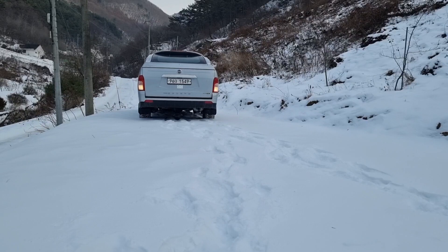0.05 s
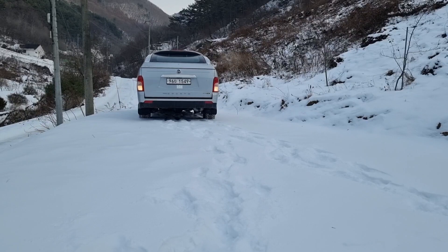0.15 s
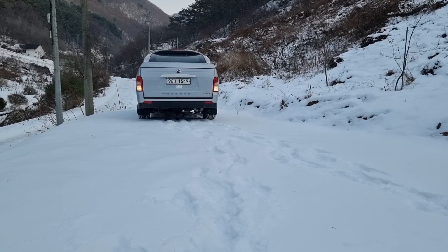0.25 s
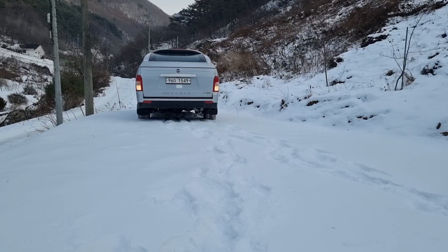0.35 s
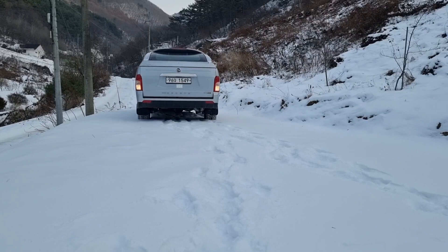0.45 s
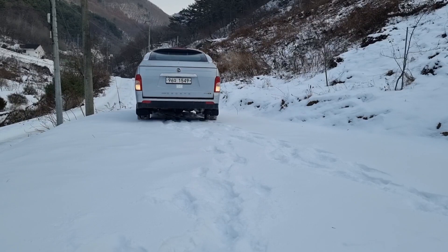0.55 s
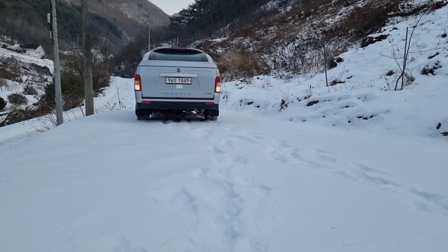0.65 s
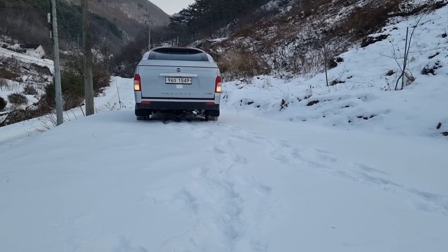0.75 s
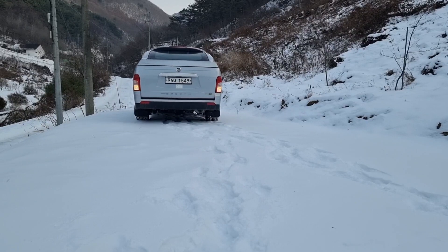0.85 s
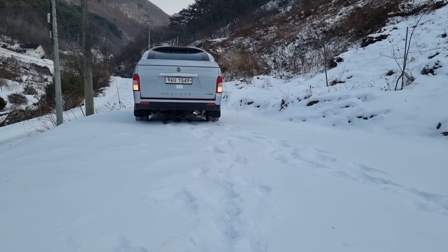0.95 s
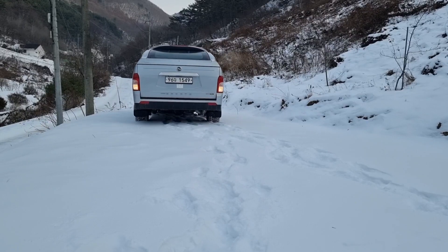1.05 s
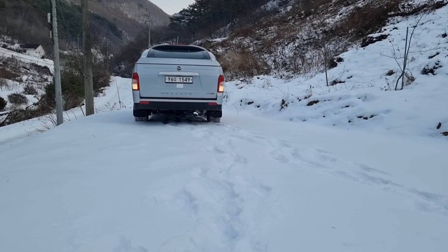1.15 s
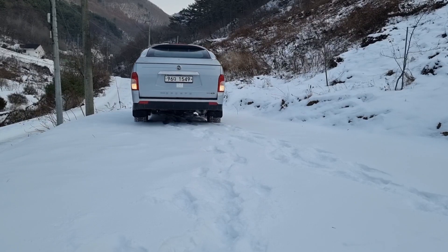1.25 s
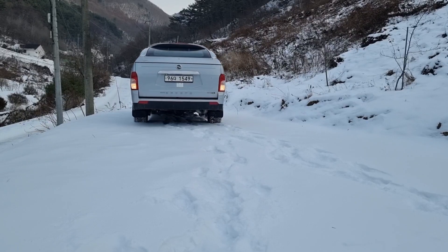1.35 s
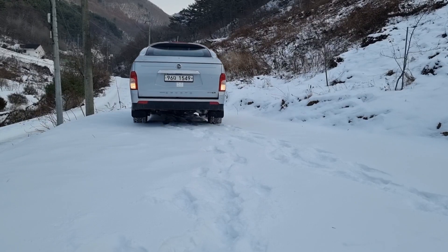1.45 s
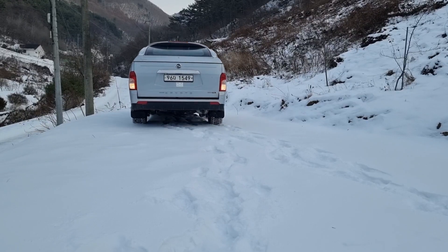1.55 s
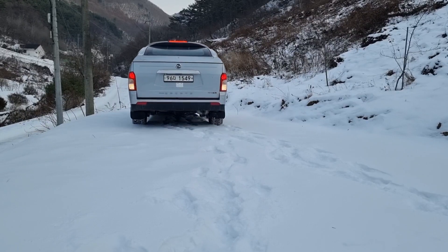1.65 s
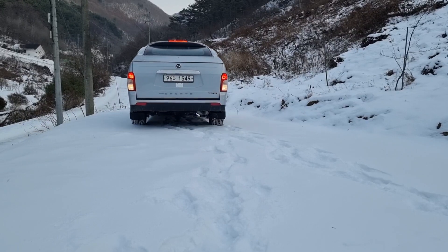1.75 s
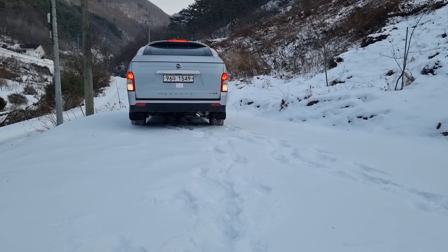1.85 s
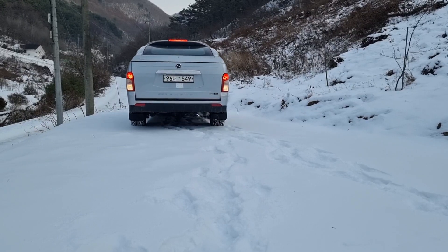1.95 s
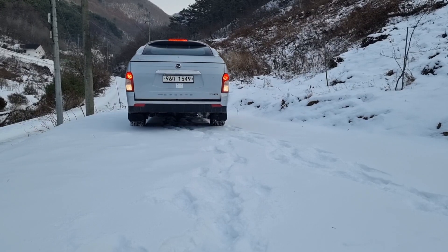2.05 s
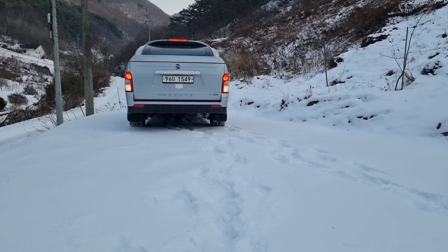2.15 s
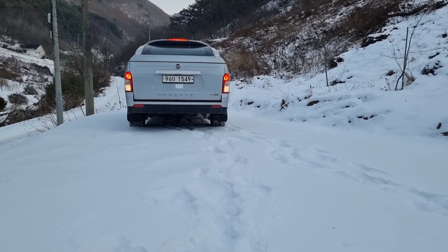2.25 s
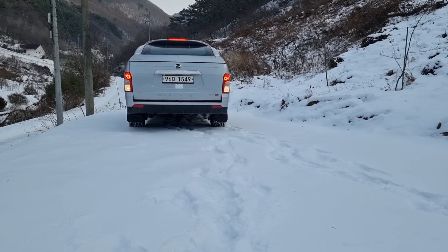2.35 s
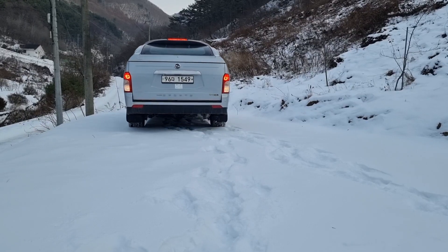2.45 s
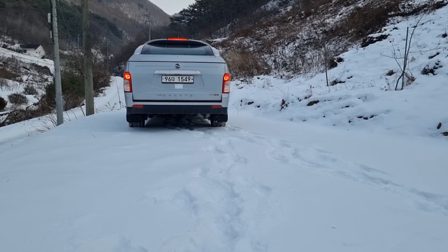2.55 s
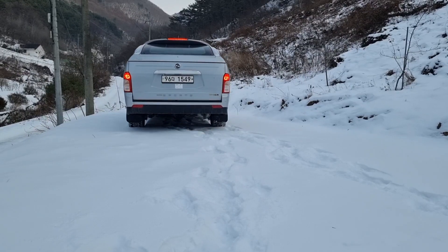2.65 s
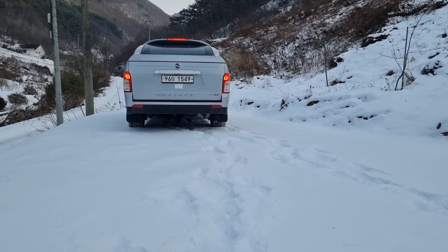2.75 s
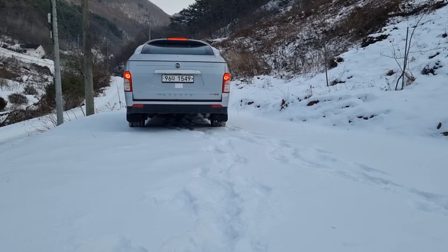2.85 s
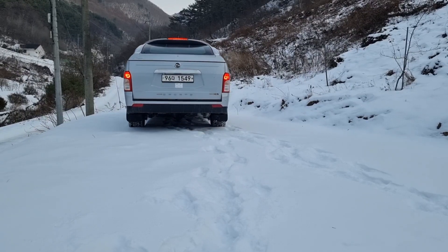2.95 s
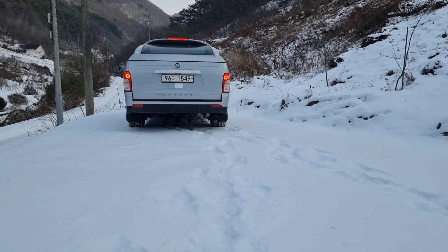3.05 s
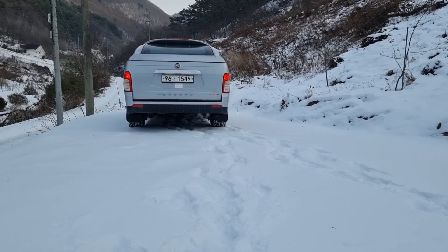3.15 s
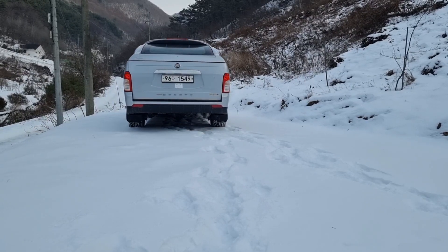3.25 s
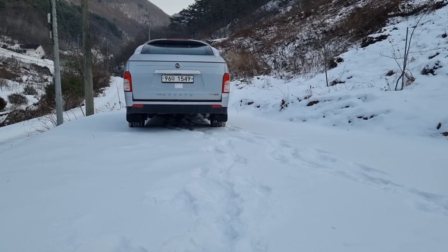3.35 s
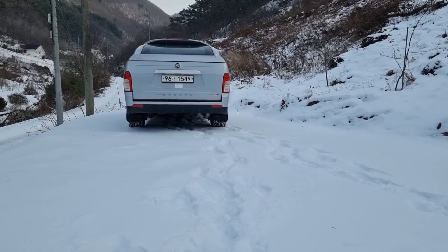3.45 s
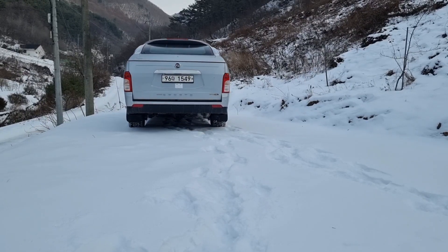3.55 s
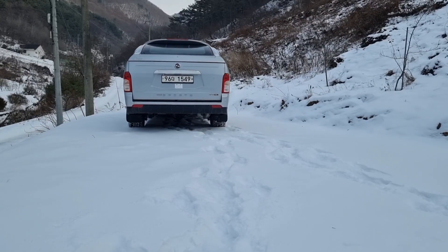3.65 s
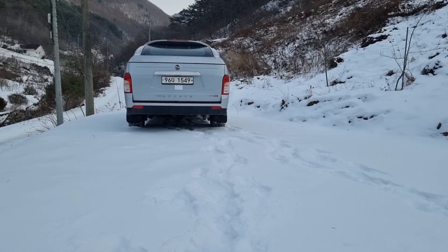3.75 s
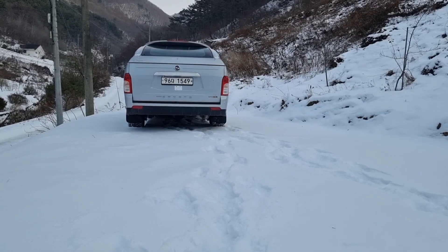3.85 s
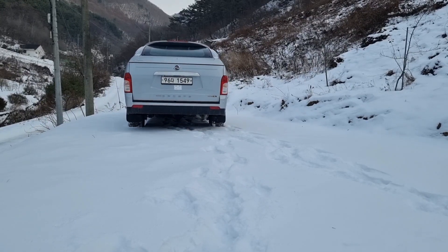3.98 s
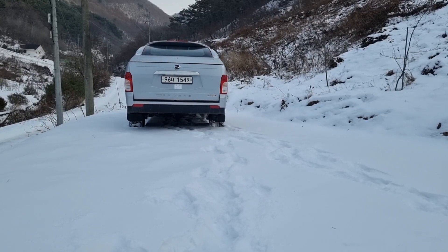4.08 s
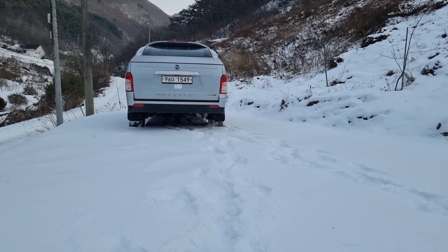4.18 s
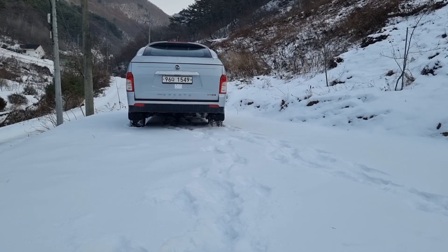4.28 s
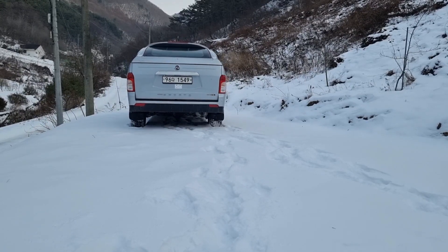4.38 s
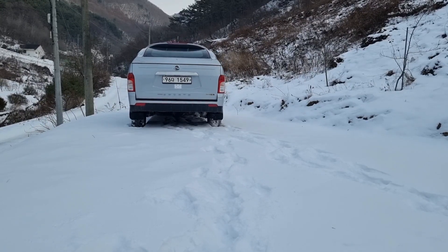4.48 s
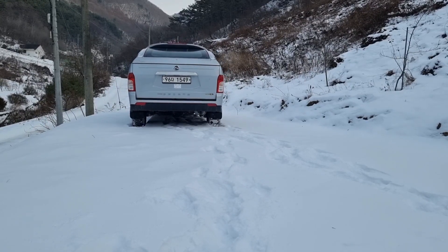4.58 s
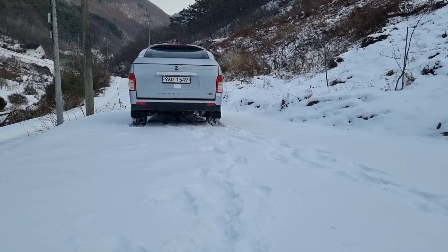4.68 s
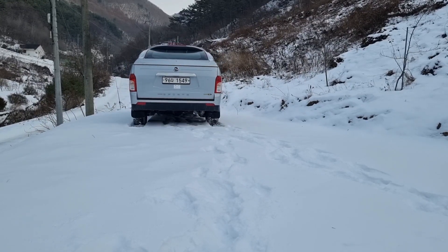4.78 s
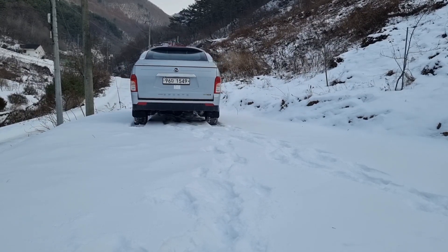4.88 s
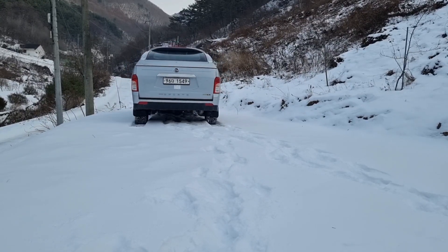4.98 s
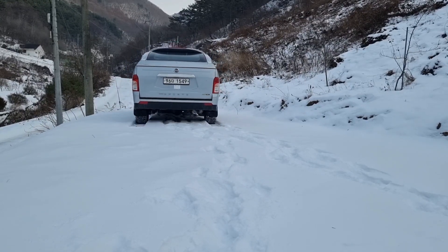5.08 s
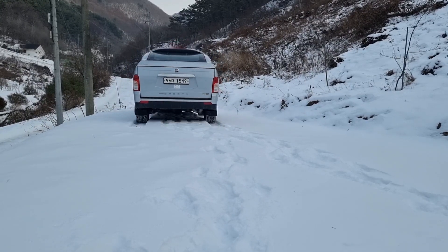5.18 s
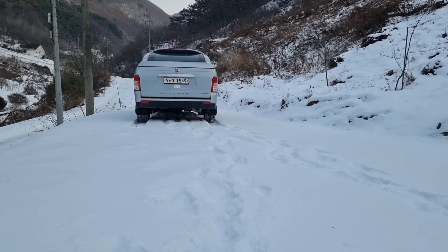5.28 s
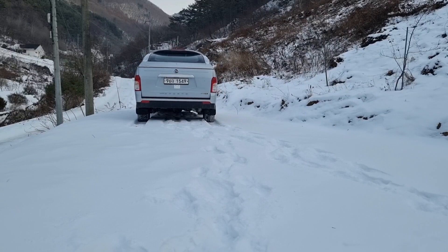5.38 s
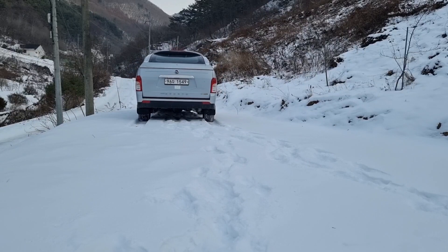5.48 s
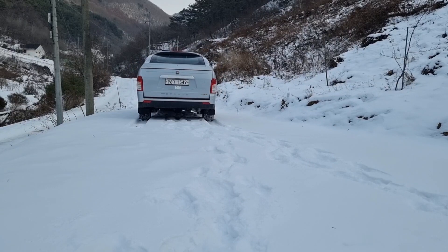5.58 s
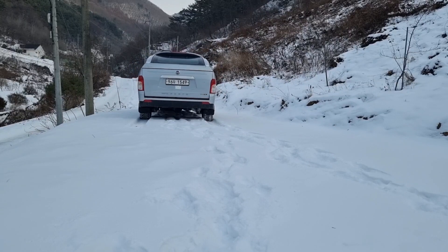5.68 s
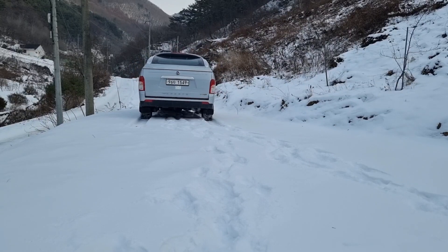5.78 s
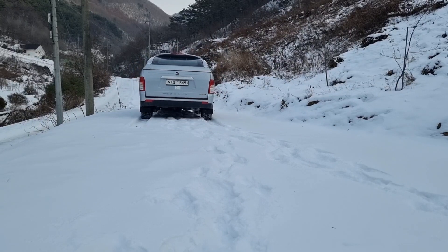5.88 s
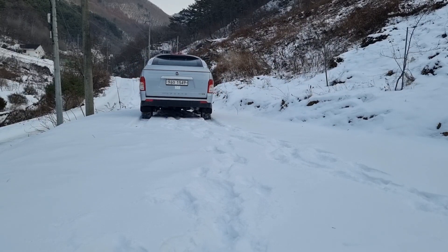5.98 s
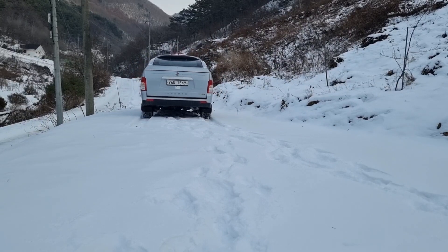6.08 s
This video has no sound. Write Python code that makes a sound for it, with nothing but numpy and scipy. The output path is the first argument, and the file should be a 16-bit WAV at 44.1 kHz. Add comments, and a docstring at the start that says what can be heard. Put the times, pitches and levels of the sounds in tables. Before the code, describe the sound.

A diesel pickup backs through crunching deep snow, stops and idles with a clatter, clunks into gear, then pulls away revving and whining.

```python
"""A four-cylinder diesel pickup backs up through deep snow, stops, idles, clunks into gear and pulls away revving.
The exhaust is a stack of tones locked to the firing rate; each firing also knocks as a burst of noise.
Valve gear pings, panels drone and gears whine; clunks, snaps and squeaks are brief rings, noises and glides.
The tyres pack the snow with a lumpy rumble, crunch and grains; low thuds come from snow, wind and exhaust.
It is heard from behind through two microphone ports on an open hillside, over faint air noise and hiss."""
import sys
import numpy as np
from scipy import signal
from scipy.fft import rfft, irfft
from scipy.io import wavfile
from scipy.ndimage import uniform_filter1d

SR = 44100
rng = np.random.default_rng(int(sys.argv[2]) if len(sys.argv) > 2 else 0)


def generate_wav(sig):
    """Save sig (samples, or channels by samples) to the path in sys.argv[1] as 16-bit PCM at SR."""
    pcm = np.round(np.clip(np.atleast_2d(sig).T, -1, 1) * 32767).astype(np.int16)
    wavfile.write(sys.argv[1], SR, pcm)


N = 269892
T = np.arange(N) / SR  # time of each sample (s)
HZ = np.fft.rfftfreq(N, 1 / SR)  # frequency axis of the spectra

# Spectra give only a tone colour: dB per Hz is relative, and the level is set elsewhere.
# Far valley and preamp hiss. Each row: frequency in Hz, level in dB per Hz.
AIR = [(60, -21.5), (120, 4), (250, -27), (600, -20), (1100, -22), (2800, -25.5), (8000, -39.5),
       (11400, -44), (12500, -41), (15600, -43)]
AIR_DB = -68.5

# Likeness of broad noise at the two ports. Each row: frequency in Hz, likeness from 0 to 1.
SAME = [(30, .2), (70, 0.72), (130, 0.97), (250, .8), (400, 0.42), (550, 0.68), (800, .4), (1100, 0.61),
        (1400, 0.17), (1900, 0.76), (2300, 0.81), (2700, 0.31), (4200, 0.72), (5500, 0.29), (7000, 0.35),
        (8500, 0.48), (11000, .1), (15000, .02)]
# How far broad noise at the left port leads. Each row: frequency in Hz, lead in radians.
TURN = [(330, 0), (520, 1), (750, 1.25), (1100, 3), (1400, 1.2), (1700, -0.3), (2100, 0.25), (2800, 0.37),
        (4200, -0.15), (6500, 1), (8200, -1), (10000, 2.5)]
# Balance of the ports. Each row: frequency in Hz, left over right in dB.
LEAN_DB = [(60, 1.5), (180, 0.3), (300, 1), (450, 5.5), (700, 2.5), (1200, 2), (1700, 2), (2500, 4.5),
           (4200, 2), (5600, 4), (7400, 6.5), (8200, -1.4), (15000, 0.5)]
LEAD_S = 6.2e-5  # the truck is nearer the left port
EDGE_HZ = 15650  # upper limit of the sound

# Level of the deepest bass. Each row: time in seconds, middle level in dB.
BOOM = [(0, -62), (.6, -53.5), (1.9, -49.5), (2.5, -49.5), (3.0, -51.5), (3.7, -53.5), (4.1, -54.5),
        (4.9, -52), (5.3, -56), (6.12, -56)]
# Colour of the deepest bass. Each row: frequency in Hz, level in dB per Hz.
BOOM_COLOUR = [(5, -71.5), (12, -26.5), (25, -4), (45, 9.5), (58, 13.0), (75, -32.5), (120, -78.0), (240, -110)]

# Short low thuds: snow under the tyres, wind buffets while standing, hard exhaust puffs when pulling away.
# Each row: middle in seconds, length in seconds, peak in dB, pitch in Hz.
THUDS = [(0.062, 0.24, -60, 85.4), (0.175, 0.068, -42, 81.7), (0.508, 0.14, -40.5, 99.6),
         (0.7, 0.084, -43, 41.5), (0.778, .08, -50, 84), (1.092, 0.093, -42, 83.6),
         (1.16, 0.18, -46, 101.6), (1.239, 0.12, -51, 49.7), (1.27, .07, -47, 107),
         (1.463, 0.15, -42.5, 82.8), (1.543, 0.084, -41.5, 74), (1.621, 0.074, -44, 48.6),
         (1.714, 0.06, -37, 95.4), (1.77, 0.1, -59, 204.3), (1.793, 0.1, -44, 80.8),
         (1.829, 0.098, -48, 53), (1.962, 0.16, -37.5, 65.36), (2.113, 0.11, -37.5, 80.4),
         (2.18, 0.094, -33, 88.3), (2.344, 0.12, -34.5, 82.7), (2.427, 0.064, -37, 85.2),
         (2.584, 0.097, -34.5, 89), (2.721, .07, -35.5, 108.6), (2.914, 0.13, -40.5, 63.7),
         (2.962, 0.036, -43, 63), (3.08, 0.05, -37.5, 72.5), (3.327, 0.051, -38.5, 66),
         (3.42, 0.12, -37.5, 54.1), (3.785, 0.03, -41.5, 63.7), (3.8, 0.049, -61, 200),
         (3.856, 0.1096, -36.5, 97.5), (3.86, 0.046, -50, 202.5), (3.908, 0.062, -32, 83),
         (3.943, 0.0447, -33, 102.6), (3.94, 0.0598, -45.5, 177.5), (4.021, 0.095, -38, 37.7),
         (4.06, 0.089, -59.5, 199), (4.16, 0.14, -47.5, 53), (4.305, 0.08, -46, 63.3),
         (4.655, 0.11, -37.5, 91), (4.706, 0.03, -36, 64.9), (4.764, 0.021, -37, 65),
         (4.822, 0.051, -41, 66), (4.947, 0.029, -35, 65), (4.981, 0.026, -28.5, 51.3),
         (5.083, 0.082, -33, 62.5), (5.354, 0.16, -42.5, 52.7)]
THUD_CRUNCH_DB = -36  # crunch added along with a thud, on top of the thud's own dB
# While the truck stands the low thuds differ more between the ports.
STANDING_FROM_S, STANDING_TO_S, STANDING_DRIFT = 2.8, 3.75, 1.1  # extra drift in radians

# Tyres rolling in snow. Each row: time in seconds, rumble level in dB, crunch level in dB.
ROLLING = [(0, -52, -69), (.4, -54, -70.5), (.55, -52, -72), (.95, -49, -69), (1.2, -46.5, -68.5),
           (1.5, -49, -70.5), (1.58, -55, -68), (1.78, -49.5, -68), (1.84, -48, -70.5), (1.92, -50, -66),
           (2.06, -47, -71.5), (2.35, -44.5, -66), (2.7, -43, -68.5), (2.82, -53.5, -73.5),
           (3.55, -67.5, -78.5), (3.74, -67, -81), (3.79, -57.5, -60), (3.84, -44, -66.5),
           (4.05, -48, -66.5), (4.4, -51, -66), (4.9, -47, -65), (5.25, -57, -70), (5.8, -51, -66.5),
           (6.12, -53, -62.5)]
# Colour of the rumble. Each row: frequency in Hz, level in dB per Hz.
RUMBLE = [(8, -59.5), (20, -27), (35, -10), (55, -7), (75, 5.5), (100, 2), (130, -3.5), (180, -11),
          (250, -22), (320, -61.5), (600, -110)]
# Colour of the crunch. Each row: frequency in Hz, level in dB per Hz.
CRUNCH = [(60, -68), (150, -16.5), (220, -7.5), (300, -1.5), (400, -1), (700, -6.5), (1150, -6.5),
          (1600, -13), (3000, -50.5), (8000, -88)]
# Resonance in the crunch. Each row: frequency in Hz, width in Hz, share of power in dB.
CRUNCH_RINGS = [(1150, 130, -10.5)]
# The loudest grains of snow giving way. Each row: time in seconds (2 ms after onset), peak in dB, pitch in Hz.
GRAINS = [(.214, -64, 1130), (.757, -67, 860), (.975, -67, 1150), (.998, -59.5, 855), (1.03, -68, 1150),
          (1.055, -66, 1140), (1.08, -67, 1150), (1.095, -63, 866), (1.108, -64.5, 1150),
          (1.222, -68, 1120), (1.243, -68, 1220), (1.385, -68, 1100), (1.427, -61, 780), (1.48, -72, 1160),
          (1.555, -65, 1130), (1.59, -70, 1200), (1.65, -64.5, 1220), (1.716, -73, 1230),
          (1.765, -68, 1050), (1.895, -68, 1150), (1.915, -69, 1020), (2.137, -69, 1130),
          (2.224, -63.5, 1124), (2.253, -61, 734), (2.282, -61, 850), (2.307, -62, 1040),
          (2.342, -60, 1150), (2.345, -60, 600), (2.352, -65, 826), (2.376, -64, 1130), (2.391, -61, 1130),
          (2.417, -63.5, 740), (2.422, -65, 1130), (2.465, -72, 1170), (2.492, -60, 1129),
          (2.496, -61, 554), (2.546, -65, 1120), (2.546, -64, 800), (2.581, -59, 538), (2.583, -67, 850),
          (2.586, -64, 1080), (2.598, -66, 1180), (2.615, -61, 790), (2.693, -60, 530), (2.708, -74, 950),
          (2.713, -60, 550)]
GRIT_SHARE, GRIT_DB = 2.5, -81  # random grains: dB per dB of crunch, middle level in dB

# Driveline taking up slack. Each row: start in seconds, peak in dB.
CLUNKS = [(3.7748, -40.5), (3.8178, -35)]
# Ringing of the gear case. Each row: frequency in Hz, level in dB, time to fall 60 dB in seconds.
GEARS = [(1100, 7, 0.055), (1237, 16, 0.023), (1425, 2, 0.038), (1680, -6, .05), (2800, -8, .025)]
# Sharp snaps from under the truck. Each row: start in seconds, level in dB, centre in Hz,
# time to fall 60 dB in seconds, width as a factor either side.
SNAPS = [(1.615, -53.5, 3230, 0.039, 1.1), (1.616, -67, 1850, .06, 1.1), (2.6532, -53.5, 2140, 0.047, 1.12),
         (2.654, -62, 7100, 0.048, 1.08), (2.653, -53, 3360, .05, 1.1), (2.66, -59, 4950, 0.043, 1.1),
         (2.655, -70, 11100, .03, 1.1), (2.653, -55, 1530, 0.037, 1.15), (2.654, -60, 800, .04, 1.4),
         (2.654, -49, 3950, 0.033, 1.07), (2.731, -56.5, 1970, .024, 1.1), (3.375, -61, 1700, 0.062, 1.7),
         (3.778, -47.5, 550, 0.067, 1.22), (3.79, -66, 6400, .082, 1.1), (3.791, -60, 1800, .04, 1.8),
         (3.824, -56, 2800, 0.067, 1.06), (3.829, -50, 1450, 0.032, 1.24), (3.842, -54, 1350, 0.066, 1.3),
         (3.84, -64, 3220, .045, 1.7), (3.874, -60, 1100, .03, 1.5), (3.981, -65, 1810, .025, 1.3),
         (4.023, -62, 2600, .049, 1.7), (4.265, -59, 2400, 0.043, 1.8), (4.59, -58, 2900, 0.056, 1.1),
         (4.711, -55, 3050, 0.063, 1.1), (4.743, -56, 2250, .06, 1.16), (4.768, -62, 5840, .062, 1.05),
         (4.816, -62, 3050, 0.12, 1.12), (4.818, -62, 5100, .04, 1.1), (5.073, -63, 3050, .035, 1.1),
         (5.134, -57, 2770, .04, 1.35)]
# Squeaks and grunts as the body lurches. Each row: start in seconds, peak in dB, from Hz, to Hz,
# length in seconds, width in Hz.
SQUEAKS = [(3.885, -65, 567, 614, 0.053, 30), (3.911, -55, 616, 650, .03, 30),
           (3.917, -57.5, 430, 416, 0.023, 30), (3.936, -62.5, 3900, 3820, 0.043, 120),
           (3.938, -56, 866, 865, 0.03, 40), (3.94, -60, 391, 400, 0.037, 30),
           (3.98, -60, 600, 620, 0.021, 40), (4.018, -56, 840, 830, 0.031, 40),
           (4.025, -62, 3950, 3900, 0.053, 100), (4.022, -56, 648, 700, 0.033, 40),
           (4.036, -52, 870, 714, 0.031, 40), (4.082, -56, 700, 672, 0.058, 40),
           (4.085, -62, 596, 580, 0.04, 40), (4.135, -57.5, 585, 700, 0.024, 50),
           (4.4, -61, 410, 398, 0.044, 60)]

# Torque through the driveline, as panel levels. Each row: time in seconds, floor pan in dB, tailgate in dB.
TORQUE = [(3.72, -110, -110), (3.79, -66, -70), (3.95, -83, -74.5), (4.08, -79, -65.5), (4.35, -62, -64.5),
          (4.55, -68, -70), (4.72, -61, -64.5), (4.9, -64, -68), (5.1, -71.5, -72), (5.4, -67, -76),
          (5.55, -65, -71), (5.66, -70, -62.5), (5.9, -62, -61.5), (6.12, -69.5, -64)]
# Resonances of each panel. Each row: frequency in Hz, width in Hz, share of power in dB.
FLOOR_PAN = [(543, 31, 9), (664, 180, 0.67)]
TAILGATE = [(700, 52, 7), (640, 13, -8.5), (810, 31, -2.5)]
# Colour of each panel's noise. Each row: frequency in Hz, level in dB per Hz.
PAN_COLOUR = [(250, -80.5), (550, -7.5), (1100, -56.0)]
GATE_COLOUR = [(350, -56.0), (720, 3.0), (1400, -63.5)]
# A rough hum in the body under load. Each row: time in seconds, level in dB.
HUM = [(3.8, -76), (3.82, -88), (3.91, -64.5), (3.97, -70), (4.11, -62), (4.16, -67), (4.45, -78),
       (4.47, -55.5), (4.57, -57), (4.58, -72), (4.61, -53.5), (4.69, -67), (4.73, -59), (4.82, -63.5),
       (4.97, -60), (5.04, -65), (5.06, -74), (5.5, -66), (5.56, -59.5), (5.62, -78), (5.69, -65),
       (5.76, -67.5), (5.8, -53), (5.84, -57), (5.89, -56.5), (5.91, -64), (6.0, -56.5), (6.1, -64)]
HUM_HZ, HUM_WIDTH_HZ, HUM_PURE = 603, 30, 0.72  # HUM_PURE is the tone's share of power
# Gear whirr. Each row: time in seconds, level in dB.
WHIRR = [(3.75, -100), (3.85, -87), (4.35, -81), (4.47, -74), (4.7, -70), (4.95, -92), (5.45, -97),
         (5.7, -78), (6.12, -71)]
TEETH = 28.65  # gear whirr as a multiple of the firing rate
# Steady whines that come and go under load.
# Each row: middle in seconds, length in seconds, peak in dB, pitch in Hz.
WHINES = [(4.49, .22, -68.5, 3000), (5.28, 0.68, -71, 2748), (5.12, 0.48, -86, 1800)]
# Axle whine, climbing with road speed. Each row: time in seconds, pitch in Hz, level in dB.
AXLE = [(4.3, 1780, -100), (4.5, 1770, -82), (4.85, 1825, -79), (4.92, 1831, -66.5), (5.45, 1843, -70.5),
        (5.75, 2010, -70), (5.95, 2086, -66), (6.12, 2265, -68)]

# Valve gear that pings once a cycle. Each row: cylinder, Hz at idle, Hz when backing,
# typical level in dB, time to fall 60 dB in seconds.
PINGS = [(2, 2900, 3270, -70, 0.04), (2, 1800, 1770, -67.5, .035), (1, 2200, 4500, -70, 0.045),
         (3, 2900, 3900, -69, .025), (0, 1500, 1640, -69, .04)]
# The clearest ticks of the valve gear. Each row: start in seconds, level in dB, pitch in Hz.
TICKS = [(0.2586, -61, 3230), (0.3102, -67, 3490), (0.406, -73, 3660), (0.4284, -59, 3270),
         (0.5247, -58, 3270), (0.6225, -62, 3200), (0.7044, -62, 4480), (0.825, -64, 3260),
         (0.9028, -69, 3230), (0.926, -59, 3240), (1.0231, -65, 2880), (1.074, -64, 3640),
         (1.0984, -71, 2920), (1.1199, -62, 2920), (1.1942, -59, 3630), (1.222, -56, 1820),
         (1.2905, -62, 2980), (1.415, -62, 1780), (1.483, -60, 3860), (1.507, -74, 3100),
         (1.5584, -59, 4440), (1.615, -57.5, 3290), (1.6671, -66, 3480), (1.7863, -70, 3400),
         (1.8472, -74, 2880), (1.951, -60, 3700), (1.968, -60, 2900), (2.0961, -68, 2890),
         (2.2268, -79, 2920), (2.5511, -65, 3640), (2.8843, -69, 2950), (2.9856, -62, 4380),
         (3.019, -62, 2910), (3.1552, -63, 2870), (3.2919, -61, 2890), (3.4294, -67, 3860),
         (3.5673, -64, 2900), (3.7065, -64, 2880)]
TICK_T60_S = 0.038  # time for a tick to fall 60 dB

# Engine speed. Each row: time in seconds, firings per second.
SPEED = [(0, 41.09), (.45, 41.53), (.7, 39.34), (.95, 40.7), (1.45, 41.91), (1.8, 31.98), (3.1, 29.26),
         (3.78, 28.82), (3.9, 30.51), (4.2, 56.83), (4.3, 58.46), (4.41, 64.8), (4.85, 68.14),
         (5.39, 65.57), (5.73, 72.72), (6.12, 83.87)]
# How loud the engine runs. Each row: time in seconds, exhaust in dB before orders and pipe, clatter in dB.
ENGINE = [(0, -51.5, -71.5), (.45, -68, -68), (.95, -56.5, -70), (1.47, -61, -66.5), (1.9, -46.5, -68),
          (2.3, -55, -71.5), (2.62, -65, -70.5), (2.85, -59.5, -69.5), (3.4, -58, -68), (3.7, -66, -69),
          (4.0, -48.5, -69.5), (4.57, -46, -62), (4.82, -42.5, -61.5), (5.15, -45.5, -65),
          (5.45, -46.5, -65), (5.7, -37, -64), (5.93, -34, -63), (6.12, -38.5, -63.5)]
# How hard each cylinder knocks. Each entry: relative strength in dB.
CYLINDERS_DB = [9.3, 9.3, 9.8, 4.5]
# Colour of the knock, running light and pulling. Each row: frequency in Hz, level in dB per Hz.
IDLE = [(180, -49.5), (300, -0.5), (404, -2.5), (438, -28.5), (534, 0.5), (562, -0.5), (781, -21.5),
        (921, -26.5), (1370, -6.5), (1900, -7.5), (2830, -9.5), (4070, -11.5), (7360, -23.5), (8980, -38.5),
        (15500, -33)]
LOADED = [(180, -72), (300, -9.5), (453, -9), (590, -1.5), (877, -15), (1100, -14), (1300, -14.5),
          (1590, -11), (1840, -1), (2210, -10.5), (3560, -12), (5120, -19.5), (7120, -20.5), (11300, -37.5),
          (15500, -34)]
# Resonances of the knock, light and pulling. Each row: frequency in Hz, width in Hz, share of power in dB.
IDLE_RINGS = [(534, 110, -4.5), (1130, 28, -9), (1700, 160, -16.5), (2250, 120, -15.5), (2880, 120, -18),
              (3700, 490, -10.5), (4430, 72, -16), (7100, 2000, -12.5)]
LOADED_RINGS = [(1053, 96, -5.5), (3050, 260, -24), (5940, 80, -28)]
# Air rushing as the engine pulls. Each row: time in seconds, level in dB.
HISS = [(4.0, -110), (4.45, -98), (4.9, -85), (5.4, -89), (5.85, -90), (6.12, -90)]
# Colour of the rushing air. Each row: frequency in Hz, level in dB per Hz.
HISS_COLOUR = [(5000, -38.5), (9000, -2.5), (15500, -2)]
# What the tailpipe passes. Each row: frequency in Hz, gain in dB.
PIPE = [(28, -18), (42, -16.5), (60, -3), (80, -0.5), (95, -4.5), (130, -8.5), (165, -21), (230, -38.5),
        (340, -33)]
# Strength of each exhaust order before the pipe. Each entry: level in dB.
ORDER_DB = [1.5, 1, 1.5, -4]
# Exhaust overtones as the throttle opens.
# Each row: time in seconds, dB added to the second order, dB added to the higher orders.
BARK = [(3.9, -23, -6), (4.1, -12.5, 7.5), (4.3, 1.5, 9.5), (4.6, 5, -13), (4.85, 6.5, 2),
        (5.35, -11.5, -11), (5.7, 1.5, 7), (5.9, -0.5, 1.5), (6.1, 0, 5.5)]
UNEVEN, LOPE = 0.27, 0.13  # under load every second firing puffs harder, every fourth harder still
HARD_PUFF_S = 4.706  # one of the hardest puffs


def amp(db):
    """Turns decibels into gain."""
    return 10 ** (np.asarray(db) / 20)


def evened(x):
    """Scales a sound to an rms of 1."""
    return x / np.sqrt(np.mean(x ** 2) + 1e-20)


def curve(rows):
    """Draws each column of a timed table as straight lines, sample by sample."""
    s, *columns = np.transpose(rows)
    return [np.interp(T, s, c) for c in columns]


def read(points):
    """Reads a frequency table along the frequency axis, on a log scale."""
    f, value = np.transpose(points)
    return np.interp(np.log(HZ + 1), np.log(f + 1), value)


def coloured(x, points, rings=()):
    """Shapes a sound by a spectrum with resonances standing on it, at rms 1."""
    gain = amp(read(points))
    bare = np.sqrt(np.mean(gain ** 2))
    for hz, width, db in rings:  # db compares the resonance's power with the bare spectrum's
        ring = 1 / (1 + (2 * (HZ - hz) / width) ** 2)
        gain = np.hypot(gain, bare * amp(db) * evened(ring))
    return evened(irfft(rfft(x) * gain, N))


def noise(likeness=1, turned=1):
    """Makes white noise for two ports, partly alike and shifted in phase at each frequency."""
    a, b = rfft(rng.standard_normal((2, N)))
    same = np.clip(likeness * read(SAME), 0, 1)
    shared = same * a * np.exp(-1j * turned * read(TURN))
    return irfft([a, shared + np.sqrt(1 - same ** 2) * b], N)


def chance(per_s):
    """Makes a random curve of rms 1 that changes about per_s times a second."""
    smooth = 1 / (1 + (HZ / per_s) ** 4)
    return evened(irfft(rfft(rng.standard_normal(N)) * smooth, N))


def add(mix, s, sound):
    """Mixes a sound in at a time in seconds."""
    part = mix[..., round(s * SR):][..., :sound.shape[-1]]
    part += sound[..., :part.shape[-1]]


def swells(rows, hold=1):
    """Gain and tone that rise and fall once around each row's middle; a larger hold flattens the top."""
    gain, tone = np.zeros(N), np.zeros(N, complex)
    for s, length, db, hz in rows:
        u = np.arange(0, length, 1 / SR)
        shape = amp(db) * np.minimum(1, hold * np.sin(np.pi * u / length) ** 2)
        start = max(s - length / 2, 0)
        add(gain, start, shape)
        add(tone, start, shape * np.exp(2j * np.pi * hz * u))
    return gain, tone


def resonate(x, hz, width):
    """A resonance that may move: shifts hz down to zero, smooths twice and shifts back."""
    turn = np.exp(2j * np.pi * np.cumsum(hz * np.ones(x.shape[-1])) / SR)
    r = np.exp(-np.pi * width / SR)
    smoothed = signal.lfilter([1], np.convolve([1, -r], [1, -r]), x / turn)
    return evened((turn * smoothed).real)


def valley_air():
    """Far valley and preamp hiss: steady coloured noise."""
    return amp(AIR_DB) * coloured(noise(likeness=0.55), AIR)


def boom():
    """Lumpy noise in the deepest bass, little alike at the two ports."""
    level_db = curve(BOOM)[0] + 3.64 * chance(3.4)
    return amp(level_db) * coloured(noise(likeness=0.082), BOOM_COLOUR)


def low_thuds():
    """Low thuds of snow, wind and hard exhaust puffs ring briefly; their phase drifts between the ports."""
    rings = swells(THUDS)[1]
    standing = (T > STANDING_FROM_S) * (T < STANDING_TO_S)
    drift = (0.36 + STANDING_DRIFT * standing) * chance(1.8)
    return (rings * np.exp(np.outer([0, 1j], drift))).imag


def snow_rumble_and_crunch():
    """Packing snow gives uneven low noise and a flickering crunch that rises with each thud."""
    rumble_db, crunch_db = curve(ROLLING)
    rumble = coloured(noise(likeness=0.96) * amp(2.16 * chance(12.0)), RUMBLE)
    flicker = amp(1.4 * chance(15) + 2.0 * chance(280))
    crunch = coloured(noise() * flicker, CRUNCH, CRUNCH_RINGS)
    thud_gain = swells(THUDS)[0]
    crunch_gain = np.hypot(amp(crunch_db), amp(THUD_CRUNCH_DB) * thud_gain)
    return amp(rumble_db) * rumble + crunch_gain * crunch


def grain(hz, rise_s=.004):
    """One clump of snow crystals breaking: a few cycles that swell and die, peak about 1."""
    t = T[:1300]
    u = t / rise_s
    return np.sin(2 * np.pi * hz * t) * u * np.exp(1 - u)


def snow_grains():
    """Clumps of crystals break as short pitched grains: many random ones and the loudest in a table."""
    grit, loud = np.zeros((2, 2, N))
    for when, pitch, size, side in rng.random((1500, 4)):
        sound = np.outer([side, 1 - side], grain(720 + 650 * pitch))
        add(grit, when * T[-1], sound * (size + .02) ** -.3)
    for s, db, hz in GRAINS:
        add(loud, s - .002, amp(db) * grain(hz, rise_s=0.0032))
    crunch_db = curve(ROLLING)[1]
    # the random grains follow the crunch, more steeply
    grit_db = GRIT_DB + GRIT_SHARE * (crunch_db - crunch_db.mean()) + 2.5 * chance(10)
    return amp(grit_db) * evened(grit) + loud


def clunks():
    """Slack taken up in the driveline strikes the gear case, which rings in several fading modes."""
    out, t = np.zeros((2, N)), T[:6000]
    ring = np.zeros((2, len(t)))
    for k, (hz, db, t60) in enumerate(GEARS):
        sign = (-1) ** k  # neighbouring modes start opposed
        ring += sign * amp(db - 60 * t / t60) * np.sin(2 * np.pi * hz * t + [[0], [.3]])
    ring = ring * (1 - np.exp(-t / 0.0013)) ** 2
    for s, db in CLUNKS:
        add(out, s, amp(db) * ring / abs(ring).max())
    return out


def snaps():
    """Each snap is a band of noise that starts sharply and dies away."""
    out, t, hiss = np.zeros((2, N)), T[:6000], noise()
    for s, db, hz, t60, wide in SNAPS:
        piece = hiss[:, round(s * SR):][:, :len(t)]
        b, a = signal.butter(2, [hz / wide, hz * wide], "band", fs=SR)
        band = evened(signal.lfilter(b, a, piece))
        add(out, s, amp(db - 60 * t / t60) * (1 - np.exp(-t / 0.0012)) * band)
    return out


def squeaks():
    """Each squeak is a brief tone that glides, made rough by a random wobble of its phase."""
    out, t, wobble = np.zeros((2, N)), T[:6000], rng.standard_normal(N)
    for s, db, from_hz, to_hz, length, width in SQUEAKS:
        u = t[t < length] / length
        glide = 2 * np.pi * (from_hz + (to_hz - from_hz) * u) / SR
        rough = uniform_filter1d(wobble[round(s * SR):][:len(u)], size=40)
        step = glide + np.sqrt(2 * np.pi * width / SR) * rough
        shape = np.sin(np.pi * u ** 0.71) ** 1.7
        add(out, s, amp(db) * shape * np.sin(np.cumsum(step) + [[0], [.3]]))
    return out


def panels():
    """The floor pan and tailgate resonate, and drone louder or softer with the torque."""
    pan_db, gate_db = curve(TORQUE)
    pan = coloured(noise(), PAN_COLOUR, FLOOR_PAN)
    gate = coloured(noise(likeness=1.95, turned=.1), GATE_COLOUR, TAILGATE)
    return amp(pan_db + 1.9 * chance(2.1)) * pan + amp(gate_db + 2.55 * chance(7.4)) * gate


def body_hum():
    """A wavering tone mixed with narrow noise makes a rough hum in the body."""
    tone = np.sqrt(2) * np.sin(2 * np.pi * HUM_HZ * T + 0.8 * chance(7.6) + [[0], [.7]])
    rough = resonate(noise(), HUM_HZ, HUM_WIDTH_HZ)
    level = (T > HUM[0][0]) * amp(curve(HUM)[0] + 0.78 * chance(25))
    return level * (np.sqrt(HUM_PURE) * tone + np.sqrt(1 - HUM_PURE) * rough)


def gear_whirr(rate):
    """Turning gears make a broad resonance of noise that follows the engine speed."""
    return amp(curve(WHIRR)[0] + 4 * chance(45)) * resonate(noise(), TEETH * rate, 420)


def whines():
    """Narrow whines keep their middle pitch while level and phase flutter."""
    flutter = amp(3 * chance(30))
    wander = 1.3 * chance(15) + [[0], [-.2]]
    return flutter * (swells(WHINES, hold=2.6)[1] * np.exp(1j * wander)).imag


def axle():
    """The axle sings as one tone whose pitch climbs with road speed."""
    hz, db = curve(AXLE)
    level = (T > AXLE[0][0]) * amp(db + 2.1 * chance(29))
    return level * np.sin(2 * np.pi * np.cumsum(hz) / SR + 0.67 * chance(12) + [[0], [.4]])


def pings(turns, rate):
    """Valve gear rings shortly: pings tied to one cylinder below 45 firings per second, and timed ticks."""
    out, t = np.zeros((2, N)), T[:2000]
    luck = rng.standard_normal((400, len(PINGS)))
    for firing, at in enumerate(np.flatnonzero(np.diff(np.floor(turns))), 1):
        for k, (cylinder, idle_hz, backing_hz, db, t60) in enumerate(PINGS):
            if firing % 4 == round(cylinder) and rate[at] < 45:
                hz = np.interp(rate[at], [30, 40], [idle_hz, backing_hz])
                hz = hz * (1 + 0.022 * luck[firing + 1, k])
                level = amp(db + 3.0 * luck[firing, k] - 60 * t / t60)
                add(out, at / SR, level * (1 - np.exp(-t / 0.0017)) * np.sin(2 * np.pi * hz * t))
    for s, db, hz in TICKS:
        level = amp(db - 60 * t / TICK_T60_S)
        add(out, s, level * (1 - np.exp(-t / 0.0021)) * np.sin(2 * np.pi * hz * t))
    return out


def air_rush():
    """Air rushing as the engine pulls: high, coloured noise."""
    return amp(curve(HISS)[0]) * coloured(noise(), HISS_COLOUR)


def block(turns, rate):
    """Each firing strikes the block as a fading noise burst, over valve noise that grows with speed."""
    clatter_db = curve(ENGINE)[1]
    load = np.interp(T, [3.75, 4.3], [0, 1])
    firing = np.floor(turns).astype(int)
    blow_db = np.take(CYLINDERS_DB, firing % 4) + 1.2 * rng.standard_normal(400)[firing]
    since = (turns % 1) / rate  # seconds since the last firing
    burst = amp(blow_db) * since ** 0.42 * np.exp(-since / 0.0088)
    drive = noise() * (evened(burst) + 0.019 * rate + 0.04 * load)
    idle = coloured(drive, IDLE, IDLE_RINGS)
    pulling = coloured(drive, LOADED, LOADED_RINGS)
    return amp(clatter_db) * (np.sqrt(1 - load) * idle + np.sqrt(load) * amp(1.0) * pulling)


def exhaust(turns, rate):
    """Orders (multiples) of the firing rate add up to puffs; they waver more at lower engine speed."""
    pipe_hz, pipe_db = np.transpose(PIPE)
    pulling = np.clip((rate - 30) / 12, 0, 1) * (T > CLUNKS[0][0])
    second_db, higher_db = curve(BARK) * pulling
    levels_db = curve(ENGINE)[0] + [0 * T, second_db, higher_db, higher_db] + np.c_[ORDER_DB]
    since = turns - np.interp(HARD_PUFF_S, T, turns)  # firings counted from a hard puff
    angle = 2 * np.pi * since + 0.22 * chance(6.7)
    across = np.outer([0, 1], -0.05 + 0.16 * chance(0.73))  # the two ports drift apart a little
    evening = np.interp(T, [4.95, 5.15], [1, .3])  # every second puff stands out less later on
    chug = 1 + UNEVEN * pulling * evening * np.cos(np.pi * since)
    chug = chug + LOPE * pulling * np.cos(np.pi * since / 2)
    puffs = np.zeros((2, N))
    for k, db in enumerate(levels_db, 1):
        level_db = db + np.interp(k * rate, pipe_hz, pipe_db) + 90 / rate * chance(4.6)
        puffs += amp(level_db) * np.sqrt(2) * np.cos(k * angle + 0.2 * chance(5.8) + across)
    return -chug * puffs


def scene():
    """Adds all sources as they reach the two ports."""
    rate, = curve(SPEED)
    turns = np.cumsum(rate) / SR  # firings so far
    blows = turns + .25  # the knock leads the loudest moment of each firing
    background = valley_air() + boom() + low_thuds()
    tyres = snow_rumble_and_crunch() + snow_grains()
    knocks = clunks() + snaps() + squeaks()
    driveline = panels() + body_hum() + gear_whirr(rate) + whines() + axle()
    engine = pings(blows, rate) + air_rush() + block(blows, rate) + exhaust(turns, rate)
    return background + tyres + knocks + driveline + engine


def record(dry):
    """The left port hears earlier and mostly louder; the ends fade briefly and the top is cut off."""
    lean = amp(read(LEAN_DB) / 2) * np.exp(1j * np.pi * HZ * LEAD_S)  # half the difference to each port
    faded = dry * signal.windows.tukey(N, 200 / N)
    ports = irfft(rfft(faded) * [lean, 1 / lean], N)
    low_pass = signal.firwin(1023, EDGE_HZ, window=("kaiser", 12), fs=SR)
    return signal.oaconvolve(ports, low_pass[None], "same")


dry = scene()
out = record(dry)
generate_wav(out)
```